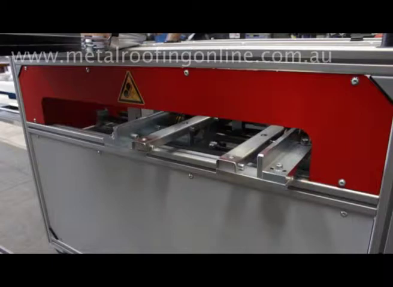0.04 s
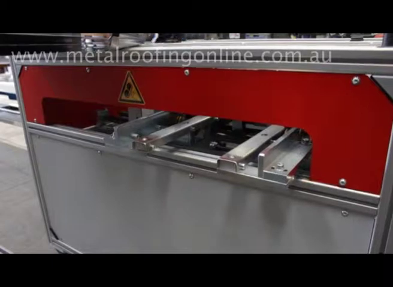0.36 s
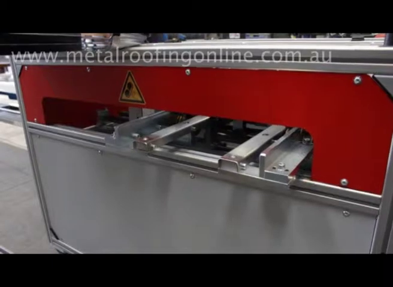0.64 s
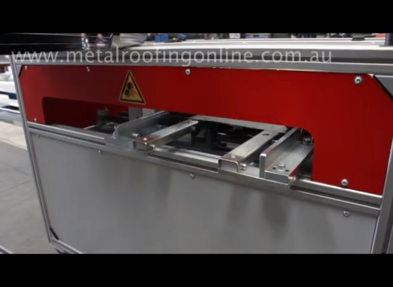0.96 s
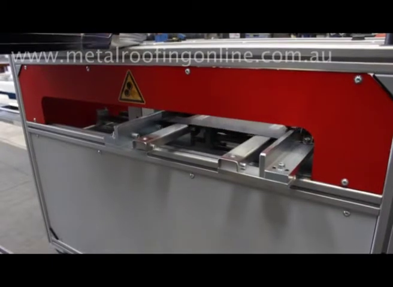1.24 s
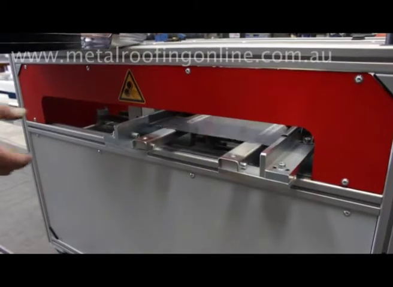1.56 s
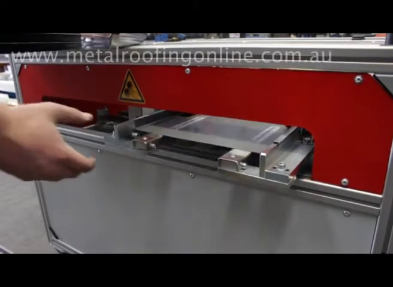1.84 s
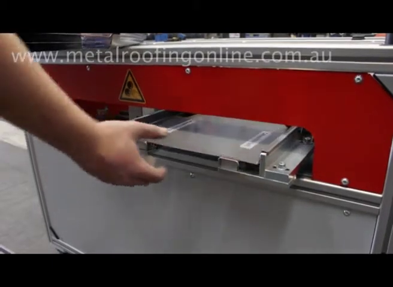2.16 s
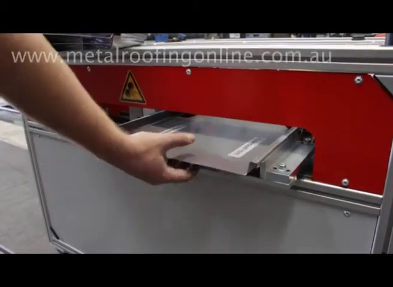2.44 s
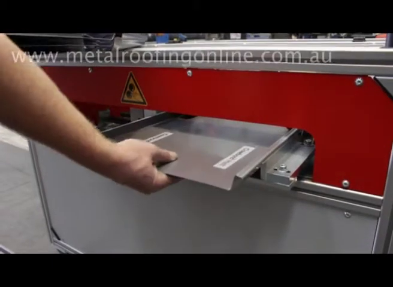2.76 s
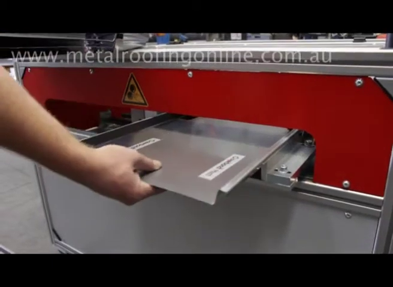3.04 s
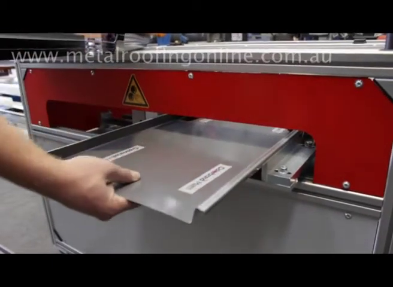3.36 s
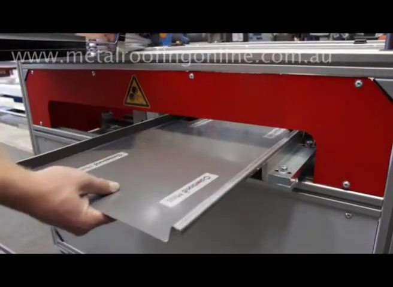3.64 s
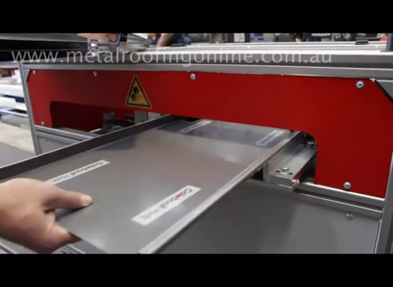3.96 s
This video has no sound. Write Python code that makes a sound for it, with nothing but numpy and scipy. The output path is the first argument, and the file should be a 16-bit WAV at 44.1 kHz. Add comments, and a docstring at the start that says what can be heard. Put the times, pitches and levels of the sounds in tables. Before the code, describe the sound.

A metal-forming machine runs close by in a workshop, slightly right, with a steady hum and thin high whistle. A steel sheet ticks over guides, pinging at 0.7 seconds and knocking lightly near 1.4. From 2.1 a shear grinds, with three loud, briefly ringing clacks at about 2.4, 2.6 and 3 seconds. From 3.3 to 4 the freed sheet groans, rumbles and scrapes along the rails.

```python
"""Roll-forming a steel roofing panel

In a workshop, close to the microphone and a little to the right, a roll-former feeds out a panel.
The panel ticks over the guides, the shear grinds through its stroke with three loud clacks, and the
freed sheet is drawn out by hand, rumbling and scraping on the rails. Underneath, the motor hums and
the inverter whistles near 6 and 12 kHz."""
import sys
import numpy as np
from scipy import signal
from scipy.io import wavfile

SR = 44100
rng = np.random.default_rng(int(sys.argv[2]) if len(sys.argv) > 2 else 0)


def output_pcm(signal):
    """Save a mono or channel-first signal as 16-bit PCM at the path in sys.argv[1].

    Samples are clipped to [-1, 1] before scaling.
    """
    pcm = np.clip(np.atleast_2d(signal).T, -1, 1) * 32767
    wavfile.write(sys.argv[1], SR, np.round(pcm).astype(np.int16))


N = 176400
TIME = np.arange(N) / SR


def clatter():
    """Each knock is a short crowd of metal contacts that swells, holds and dies, sooner in the treble."""
    # Each row: start and length in seconds, level in dB, then thump, middle and treble boosts in dB.
    strikes = [(0.369, 0.017, -74, -16, 4, 4), (0.686, 0.006, -84.5, -10, 13.5, 25.5),
               (0.952, 0.0061, -81, 0, 15.5, -2), (1.191, 0.0043, -80.5, -8, 13.5, 1.5),
               (1.353, 0.079, -70, 2, 3, 4), (1.378, 0.0091, -69.5, 1, 6.5, 10),
               (2.363, 0.014, -55, 1, 10.5, -8.5), (2.379, 0.023, -53.5, -31, 3.5, 5.5),
               (2.646, .016, -54, -1.5, 6, 5), (2.70, 0.0067, -62, -10, 1, -26),
               (3.024, 0.01, -62.5, -7.5, 11.5, -26), (3.032, 0.018, -49, -2.5, 9.5, 2.5),
               (3.387, 0.0051, -69, 9.5, 6.5, 8.5), (3.41, 0.0054, -78, 2, 8, -8)]
    # Colour of all knocks. Each row: frequency in Hz, level in dB.
    colour = [(52, -68), (85, -8.5), (160, -7.5), (280, 0.5), (500, -8.5), (900, -13), (1600, -17.5),
              (3000, -20), (5000, -29.5), (9000, -38.5), (13000, -48), (16000, -68)]
    thump_hz, body_hz, middle_hz, treble_hz = 101, 272, 950, 5600
    attack_s, body_release_s, treble_release_s = 0.004, 0.032, 0.023
    out, streams = 0, contacts(count=4).reshape(2, 2, N)
    for k, (hz, sos) in enumerate(bands()):
        power = np.zeros(N)
        release_s = at_hz([(body_hz, body_release_s), (treble_hz, treble_release_s)], hz)
        for start, length, db, thump, middle, treble in strikes:
            i = int(start * SR)
            t = TIME[:min(SR // 4, N - i)]
            boost = at_hz([(thump_hz, thump), (body_hz, 0), (middle_hz, middle), (treble_hz, treble)], hz)
            envelope = np.minimum(t / attack_s, 1) * np.exp(-np.maximum(t - length, 0) / release_s)
            power[i:i + len(t)] += (from_db(db + boost) * envelope) ** 2
        band = signal.sosfilt(sos, streams[k % 2] * np.sqrt(power * SR / 2) + 1e-18)
        out = out + from_db(at_hz(colour, hz)) * spread(*band, hz)
    return out


def ringing_steel(rise_s=0.0024):
    """The modes of each struck part build up under a blow and die away."""
    # Modes of each part. Each row: frequency in Hz, level in dB, seconds to fall 60 dB.
    panel = [(164.2, -19.5, 0.55), (279.9, 1, 0.3), (320, -2.5, 0.19), (458.6, -3.5, 0.32),
             (521, -14, 0.35), (653, -14, 0.34), (774, -18, 0.43), (1078, -9, 0.13), (1365, -9.5, 0.13),
             (1660, -20.5, 0.29)]
    shear = [(95, -12, 0.1), (206.5, -7.5, 0.3), (250.5, -8.5, 0.23), (318.7, -6.5, .35), (346.2, 2, 0.21),
             (556.7, -15, 0.26), (1070, -15.5, 0.26), (1208, -17, 0.22)]
    frame = [(213.7, 2.5, 0.18), (339, -2.5, 0.36), (399, 1, 0.1), (483, 1.5, 0.14), (540, -2.5, 0.2),
             (593.3, 0.5, 0.18), (701, -0.5, 0.19), (894, -13, 0.32), (1097, 2, 0.16), (1270, -9, 0.22),
             (1610, 0, 0.12), (1661, -5, .15), (2291, -4.5, 0.12)]
    entry_guide = [(1122, -8.5, 0.22), (2380, -1.5, 0.059), (3150, -6, 0.07), (4070, -5, 0.08)]
    gripped_sheet = [(343, -0.5, 0.074), (452, 0, 0.053), (573, 2.5, 0.05), (660, -6, 0.053)]  # short-lived, where the hand holds it
    # Blows on each part. Each row: start in seconds, level in dB.
    panel_blows = [(2.378, -19)]
    shear_blows = [(1.36, -39.5), (1.388, -40), (1.47, -47.5), (2.646, -22.5), (2.732, -32)]
    frame_blows = [(3.033, -23.5)]
    guide_blows = [(.689, -42)]
    gripped_blows = [(3.382, -32.5), (3.391, -34)]
    parts = [(panel, panel_blows), (shear, shear_blows), (frame, frame_blows),
             (entry_guide, guide_blows), (gripped_sheet, gripped_blows)]
    out = np.zeros(N)
    for modes, blows in parts:
        for start, blow_db in blows:
            i = int(start * SR)
            t = TIME[:min(SR, N - i)]
            for hz, mode_db, t60 in modes:
                envelope = np.exp(-np.log(1000) * t / t60) * (1 - np.exp(-t / rise_s))
                mode = np.sin(2 * np.pi * (hz * t + rng.random()))
                out[i:i + len(t)] += from_db(blow_db + mode_db) * envelope * mode
    return out


def ping():
    """A tick travels along the thin sheet and arrives as a falling ping."""
    # Each row: time in seconds, pitch in Hz, level in dB.
    fall = [(.688, 1590, -57), (.696, 1440, -42.5), (.703, 1124, -51), (.712, 1100, -58)]
    return glide(fall, rough=0.18)


def shear_stroke():
    """The shear grinds through the steel."""
    # Each row: time in seconds, level in dB.
    level = [(2.1, -85), (2.22, -62), (2.34, -49), (2.45, -41), (2.55, -39.5), (2.62, -36), (2.7, -40),
             (2.82, -47), (2.92, -56), (3.05, -53), (3.3, -100)]
    # Each row: frequency in Hz, level in dB.
    colour = [(45, -55), (144, -6.5), (209, -17), (295, 1), (364, -10), (448, -8.5), (762, -8.5),
              (1210, -13.5), (1560, -15.5), (5200, -29), (6200, -38), (15000, -54.5)]
    return from_db(in_time(level) + drift(30)) * noise(colour, flicker_db=3.5)


def rumble():
    """The sheet flexes softly on the rails, with no treble."""
    # Each row: time in seconds, level in dB.
    level = [(1.3, -55.5), (1.5, -54), (1.65, -57.5), (1.95, -52.5), (2.05, -56), (2.2, -57), (2.9, -53.5),
             (3.31, -54.5), (3.4, -48.5), (3.53, -56.5), (3.63, -49.5), (3.8, -53), (4, -56.5)]
    # Each row: frequency in Hz, level in dB.
    colour = [(40, -32), (100, -9.5), (170, -2), (280, 4), (350, -5.5), (450, -7), (800, -23.5)]
    return from_db(in_time(level)) * below(noise(colour, flicker_db=2.0), hz=482)


def rub():
    """The sheet rubs on the rails in short swells."""
    # Each row: time in seconds, level in dB.
    level = [(1.86, -78), (1.955, -52.5), (2.03, -77), (2.2, -71), (2.35, -46), (2.4, -61)]
    # Each row: frequency in Hz, level in dB.
    colour = [(120, -50), (240, -20), (400, 2.5), (720, 0), (1300, -27), (3000, -52)]
    return from_db(in_time(level)) * noise(colour, flicker_db=1.5)


def groans():
    """The sheet groans as it slips, once before the cut and once as it is pulled free."""
    # One list a slip. Each row: time in seconds, pitch in Hz, level in dB.
    slips = [
        [(2.12, 270, -62), (2.18, 279, -53), (2.25, 270.3, -56), (2.3, 286, -52), (2.37, 283, -51)],
        [(3.33, 159.6, -51), (3.355, 186.7, -49.5), (3.378, 215, -43.5), (3.395, 288, -53), (3.45, 289.7, -48),
         (3.52, 236, -60)],
    ]
    return sum(glide(slip, rough=0.79) for slip in slips)


def scrape():
    """The edge of the sheet scrapes along the rails, bright and uneven."""
    # Each row: time in seconds, level in dB.
    level = [(.5, -92), (.68, -61.5), (.9, -67), (1.15, -66.5), (3.4, -81), (3.6, -65.5), (3.705, -53),
             (3.76, -65), (3.88, -63), (3.965, -50.5), (4, -58)]
    # Each row: frequency in Hz, level in dB.
    colour = [(120, -40), (500, -23), (1000, -9.5), (1700, -2.5), (3100, -2.5), (4200, -9), (8000, -23),
              (15000, -34)]
    return from_db(in_time(level) + 2.0 * drift(40)) * noise(colour, flicker_db=4.0)


def judder(width_hz=62):
    """The sheet judders over the rails: two rough resonances climb as it speeds up."""
    # Each row: time in seconds, lower resonance in Hz, level in dB.
    climb = [(3.46, 200, -61), (3.54, 220.3, -54), (3.63, 269.4, -55), (3.72, 309.4, -52), (3.79, 349, -51),
             (3.87, 365, -57.5), (4, 366, -64)]
    hz, gain = gesture(climb)
    upper = from_db(-2) * narrow_noise(1.65 * hz, width_hz)
    lower = narrow_noise(hz, width_hz)
    return below(gain * (lower + upper), hz=800)


def motor():
    """Running noise and a few wavering motor tones, nearly steady in level."""
    # Running noise, then tones. Each row: frequency in Hz, level in dB.
    colour = [(25, -13), (45, -8.5), (70, -8.5), (110, -0.5), (150, -6), (200, -4.5), (260, -8.5),
              (320, -2.5), (390, -2.5), (700, -5), (1000, -11), (1400, -7.5), (2100, -12.5), (3100, -13),
              (4000, -18), (7000, -24.5), (10000, -29.5), (12500, -29.5), (13700, -51)]
    lines = [(199.2, -74), (328.4, -64.5), (543.7, -71.5), (1114, -74.5)]
    # Slight swell of both. Each row: time in seconds, gain in dB.
    swell = [(0, 0), (1.2, 0), (1.7, -1), (3.0, 1), (3.5, -0.5), (4, 0)]
    running = from_db(-56.5) * noise(colour, flicker_db=1.0)
    hum = tones(lines, waver_db=1.5, wander_hz=2.48)
    return from_db(in_time(swell)) * (running + hum)


def inverter():
    """Close sidebands of the switching frequency beat against each other as a thin whistle."""
    # Sidebands near 6 and 12 kHz. Each row: frequency in Hz, level in dB.
    whine_lines = [(5599, -76), (5652, -81), (5782, -77), (5841, -82), (5970, -62), (6035, -65.5),
                   (6164, -74.5), (6401, -76.5)]
    octave_lines = [(11628, -82), (11935, -87), (12000, -76), (12065, -70.5), (12500, -89)]
    # Their swell as the load changes. Each row: time in seconds, gain in dB.
    whine_swell = [(.1, 2), (.45, 0.5), (.75, -2.5), (1.4, 1), (1.7, -1.5), (2.0, 1.5), (2.4, 3),
                   (2.8, 5.5), (3.05, 4), (3.2, 0), (3.42, 3), (4, 2.5)]
    octave_swell = [(0, 6), (2.1, 4), (2.6, 0), (3.2, 3), (3.5, 4.5), (4, 3)]
    # Phase at the microphone near 6 kHz. Each row: time in seconds, lead of the left side in radians.
    whine_lead = [(.3, -0.96), (1.5, -1.15), (2.5, -0.56), (3.5, -0.76)]
    # Faint hiss around the two whistles. Each row: centre in Hz, width in Hz, level in dB.
    hiss_bands = [(5980, 180, -76.5), (11950, 130, -81)]
    whine = tones(whine_lines, waver_db=0.5, wander_hz=0.9, lead_rad=in_time(whine_lead))
    octave = tones(octave_lines, waver_db=1.0, wander_hz=0.36, lead_rad=1.64)
    whistles = from_db(in_time(whine_swell)) * whine + from_db(in_time(octave_swell)) * octave
    hiss = sum(from_db(db) * narrow_noise(hz, width) for hz, width, db in hiss_bands)
    return (whistles + hiss) * pan(-2.5)


def workshop_echo(x, build_s=0.038, stereo_width=0.57):
    """The workshop's diffuse echo builds up and dies band by band."""
    # Each row: frequency in Hz, seconds to fall 60 dB.
    decay = [(60, 1), (250, 0.81), (1000, 0.62), (2500, 0.87), (7000, .95), (15000, 0.22)]
    # Each row: frequency in Hz, echo level in dB.
    colour = [(60, -11), (250, -12.5), (1000, -13), (2500, -12.5), (9000, -12)]
    t, response = TIME[:SR], 0
    for hz, sos in bands():
        fade = np.exp(-np.log(1000) * t / at_hz(decay, hz)) * (1 - np.exp(-(t / build_s) ** 2))
        fade /= np.sqrt(np.sum(fade ** 2))
        mid, side = signal.sosfilt(sos, rng.standard_normal((2, SR)))
        response = response + from_db(at_hz(colour, hz)) * spread(mid, stereo_width * side, hz) * fade
    return signal.fftconvolve(x, response, axes=1)[:, :N]


def placed(x, split_hz=4600):
    """The machine stands right of the microphone; its treble reaches both sides more evenly."""
    low = signal.sosfilt(signal.butter(1, split_hz, fs=SR, output="sos"), x)
    return low * pan(-3.5) + (x - low) * pan(-0.5)


def pan(db):
    """Stereo gains for a level of left minus right in dB."""
    return from_db(np.array([[db], [-db]]) / 2)


def spread(mid, side, hz):
    """Two unrelated signals become a stereo pair, alike in the bass and less so in the treble."""
    # Each row: frequency in Hz, correlation of left and right.
    likeness = [(30, 0.47), (100, 0.98), (400, 0.96), (1200, 0.77), (2500, 0.71), (5000, 0.47),
                (9000, 0.23), (15000, 0.24)]
    alike = np.clip(at_hz(likeness, hz), 0, 1)
    return mid + np.sqrt((1 - alike) / (1 + alike)) * side * np.array([[1], [-1]])


def contacts(count, per_second=5000, uneven_db=2):
    """Streams of dense tiny impacts of uneven size; rms 1."""
    size = from_db(uneven_db * np.minimum(rng.exponential(1, (count, N)), 4))
    sign = rng.choice([-1, 1], (count, N))
    hits = rng.random((count, N)) < per_second / SR
    return rms_one(size * sign * hits)


def noise(colour, flicker_db):
    """Stereo noise of a given colour whose bands flicker; rms 1."""
    out, white = 0, rng.standard_normal((2, 2, N))
    for k, (hz, sos) in enumerate(bands()):
        db = at_hz(colour, hz)
        if db > -46:
            band = spread(*signal.sosfilt(sos, white[k % 2]), hz)
            out = out + from_db(db + flicker_db * drift(11.5)) * band
    return rms_one(out)


def narrow_noise(hz, width_hz):
    """A narrow band of noise whose centre may move; rms 1."""
    phase = 2 * np.pi * np.cumsum(hz * np.ones(N)) / SR
    return drift(width_hz) * np.cos(phase) + drift(width_hz) * np.sin(phase)


def tones(lines, waver_db, wander_hz, lead_rad=0):
    """Tones that waver in level and pitch, the left side ahead by lead_rad."""
    out, offset = 0, np.array([[.5], [-.5]]) * lead_rad
    for hz, db in lines:
        gain = np.sqrt(2) * from_db(db + waver_db * drift(9))
        cycles = np.cumsum(hz + wander_hz * drift(3.25)) / SR + rng.random()
        out = out + gain * np.sin(2 * np.pi * cycles + offset)
    return out


def glide(rows, rough):
    """One bending mode of the sheet, sliding in pitch and roughened by noise."""
    hz, gain = gesture(rows)
    tone = np.sqrt(2) * np.sin(2 * np.pi * (np.cumsum(hz) / SR + rng.random()))
    return gain * (tone + rough * narrow_noise(hz, width_hz=52))


def gesture(rows):
    """Pitch and gain of one short sound, silent before and after."""
    times, hz, db = np.transpose(rows)
    sounding = (TIME >= times[0]) & (TIME <= times[-1])
    return np.interp(TIME, times, hz), from_db(np.interp(TIME, times, db)) * sounding


def drift(rate_hz):
    """Slow random wander of spread 1."""
    hop, settle = 40, 2000
    pole = np.exp(-2 * np.pi * rate_hz * hop / SR)
    white = rng.standard_normal(N // hop + settle + 2)
    slow = signal.lfilter([1], [1, -2 * pole, pole * pole], white)[settle:]
    return np.interp(np.arange(N) / hop, np.arange(len(slow)), rms_one(slow))


def bands():
    """Third-octave band-passes, each as centre in Hz and filter."""
    edges_hz = 22 * 2 ** (np.arange(29) / 2.94)
    return [(np.sqrt(low * high), signal.butter(2, [low, high], "band", fs=SR, output="sos"))
            for low, high in zip(edges_hz, edges_hz[1:])]


def below(x, hz):
    """Steep low-pass."""
    return signal.sosfilt(signal.butter(8, hz, fs=SR, output="sos"), x)


def in_time(rows):
    """A control curve at every sample."""
    return np.interp(TIME, *np.transpose(rows))


def at_hz(rows, hz):
    """Read a table on a log-frequency axis."""
    frequencies, values = np.transpose(rows)
    return np.interp(np.log(hz), np.log(frequencies), values)


def from_db(db):
    """Decibels to gain."""
    return 10 ** (np.asarray(db) / 20)


def rms_one(x):
    """Scale to unit rms."""
    return x / np.sqrt(np.mean(x ** 2) + 1e-20)


def scene():
    """The machine and its panel from close by; only the knocks and their ringing echo in the workshop."""
    rings = ringing_steel() + ping()
    knocks = clatter()
    echo = workshop_echo(knocks + from_db(-6.0) * rings)
    friction = shear_stroke() + rumble() + rub() + groans() + scrape() + judder()
    return placed(knocks + rings + echo + friction + motor()) + inverter()


def record(dry):
    """The microphone opens after a moment of silence; the highest treble is cut."""
    open_s, cutoff_hz = 0.072, 16200
    low_pass = signal.cheby2(16, 60, cutoff_hz, fs=SR, output="sos")
    return signal.sosfilt(low_pass, dry * (TIME >= open_s))


dry = scene()
out = record(dry)
output_pcm(out)
```